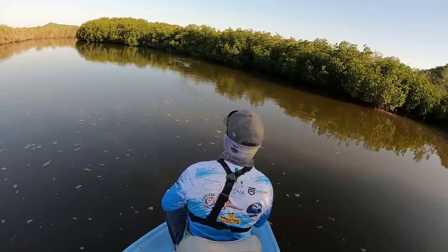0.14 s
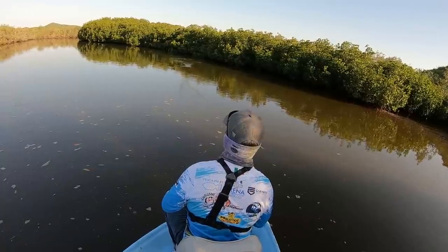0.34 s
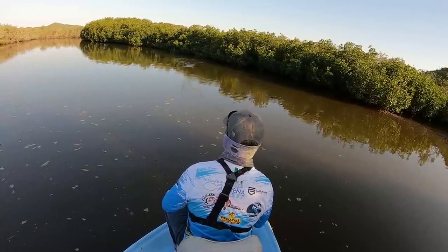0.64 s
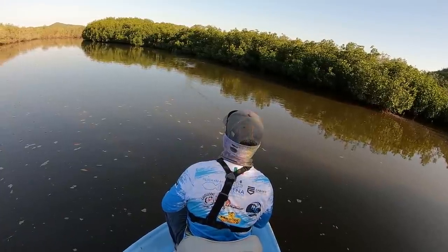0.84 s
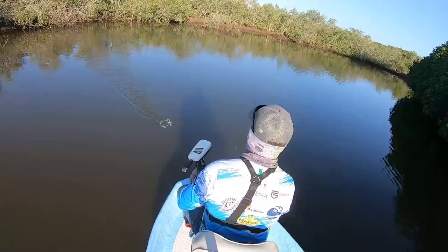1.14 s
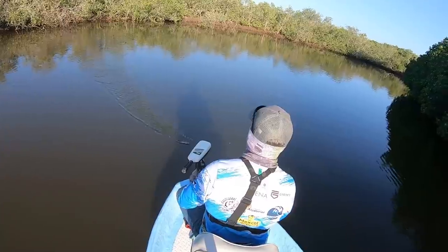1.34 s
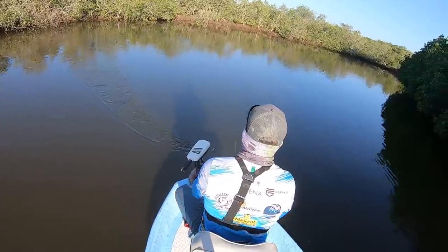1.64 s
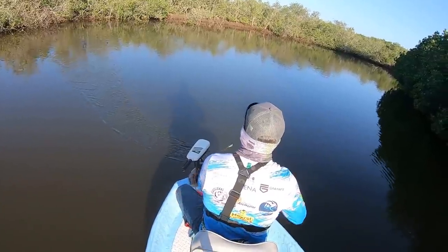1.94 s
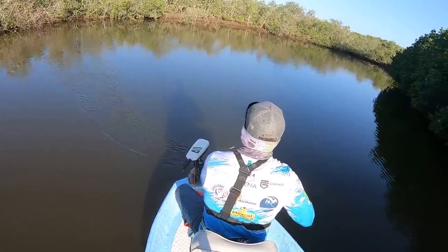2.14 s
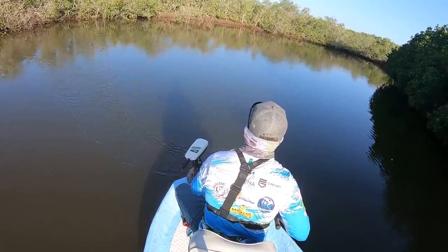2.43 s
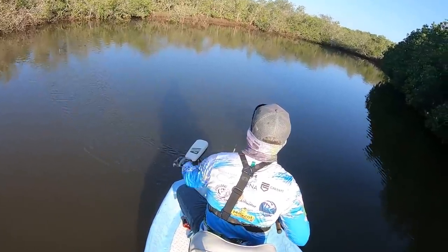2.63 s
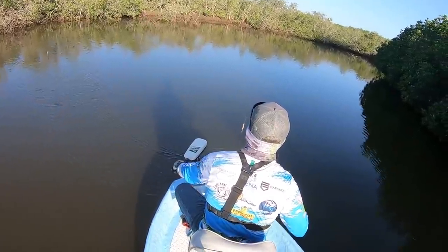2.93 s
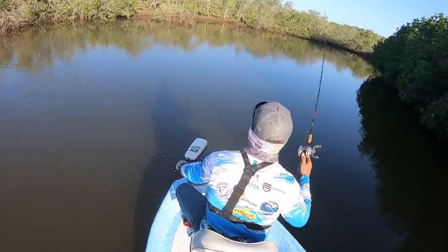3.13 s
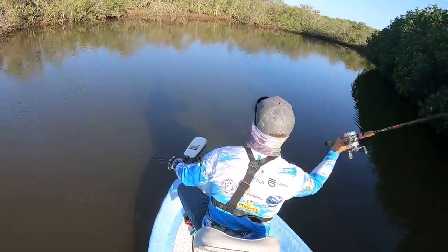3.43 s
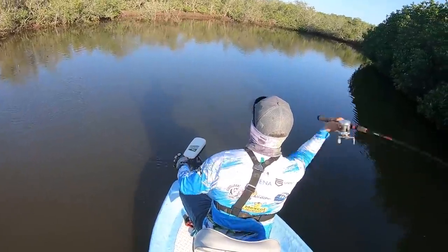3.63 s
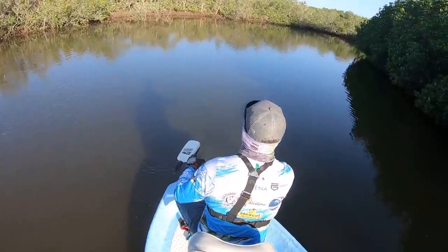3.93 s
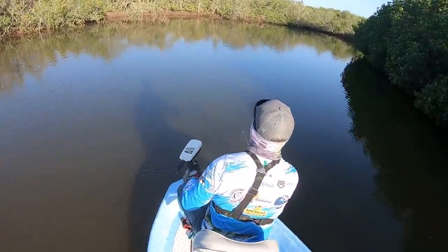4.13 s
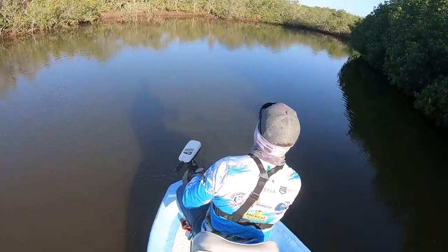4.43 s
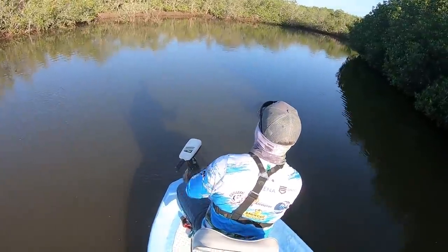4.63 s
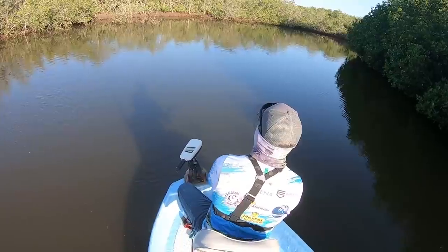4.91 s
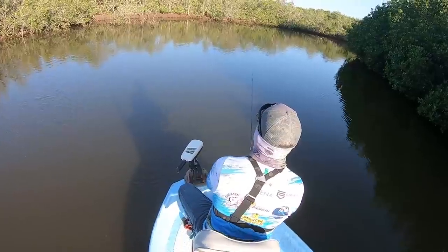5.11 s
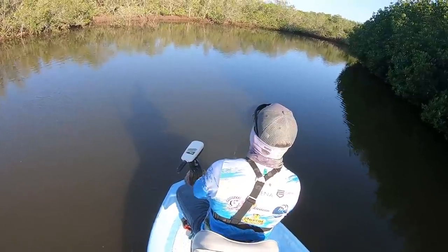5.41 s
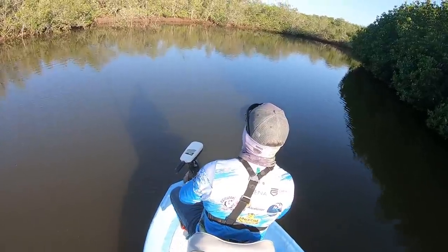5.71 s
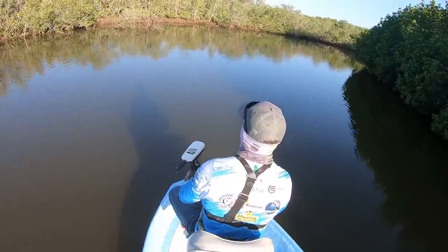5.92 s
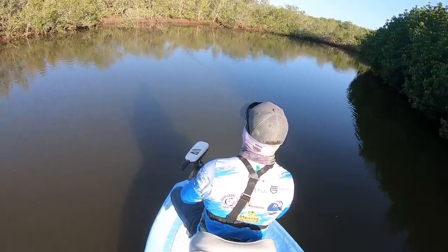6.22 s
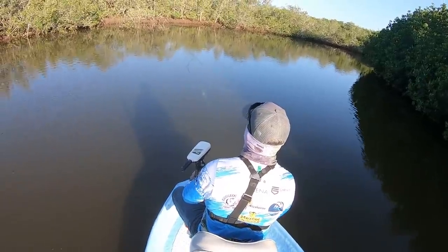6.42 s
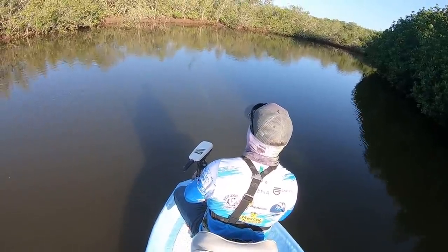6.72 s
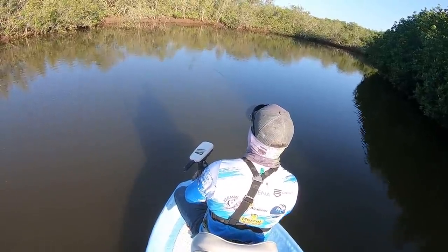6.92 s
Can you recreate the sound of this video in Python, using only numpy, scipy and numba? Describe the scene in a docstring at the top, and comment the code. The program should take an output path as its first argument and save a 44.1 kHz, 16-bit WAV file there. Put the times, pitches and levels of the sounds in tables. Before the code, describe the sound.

On a small boat in open still water, a low throbbing drone and pole thumps accompany faint winding. A lure skips out with fine spray and drips. The reel clicks open, the rod swishes back and whips forward with heavy knocks, and the spool whine slides down beneath hissing line. It stops, water laps, clicks follow and winding resumes. A camera microphone on a pole behind the angler picks up every bump, with no echo.

```python
"""Bow of a small boat on still open water: an angler casts, heard from a camera on a pole behind him.
The hull drones as a throbbing low resonance; winding, reel clicks and spray are shaped noise, rings and bubbles.
The rod swishes back and whips forward as noise swept through moving resonances, while the pole sways and knocks.
The spool whines down as wavering harmonics under hissing line, then reel clicks and winding return."""
import sys
import numpy as np
from scipy import signal
from scipy.fft import rfft, irfft, next_fast_len
from scipy.io import wavfile
from scipy.ndimage import uniform_filter1d
from numba import njit

SR = 44100
rng = np.random.default_rng(int(sys.argv[2]) if len(sys.argv) > 2 else 0)


def pcm_store(signal):
    """Save signal as 16-bit PCM."""
    levels = np.round(np.clip(np.atleast_2d(signal), -1, 1) * 32767)
    wavfile.write(sys.argv[1], SR, levels.astype(np.int16).T)


N = 311263
TIME = np.arange(N) / SR  # s
AGE = TIME[:SR // 2]  # s since a short sound was struck

# All levels in dB are relative settings. A tone is a spectrum; each row: frequency in Hz, level in dB.
# Rod tip whipping forward. Each row: time in s, eddy pitch in Hz, level in dB.
TIP = [(3.78, 2280, -65), (3.81, 2620, -49), (3.85, 3700, -55), (3.888, 5000, -45.5), (3.902, 6500, -21.5),
       (3.913, 7800, -25), (3.93, 8550, -41), (3.96, 7000, -89)]
# Thick part of the rod. Each row: time in s, eddy pitch in Hz, level in dB.
SHAFT = [(3.8, 560, -79), (3.84, 710, -49), (3.86, 810, -30), (3.885, 980, -26), (3.91, 1240, -28.5),
         (3.94, 1400, -37.5), (3.97, 1000, -84)]
# Rush of air around the whole rod. Each row: time in s, level in dB.
WHIP = [(3.805, -68), (3.83, -43.5), (3.86, -45), (3.885, -53), (3.91, -33.5), (3.95, -44)]
# Tone of that rush. Each row: frequency in Hz, level in dB.
WHIP_TONE = [(1200, -11.5), (3000, 6), (6000, -3), (9000, -16), (14000, -42)]
# The back swing: when the tip is fastest, time until half that speed, eddy pitch then, and loudest moment.
BACK_FASTEST_S, BACK_HALF_S, BACK_HZ = 3.49, .255, 5000
BACK_LOUDEST_S, BACK_DB, BACK_RISE_S, BACK_FALL_S = 3.588, -50.5, 0.42, 0.28  # rise and fall span 20 dB

# Speed of the spool. Each row: time in s, mean whine pitch in Hz.
SPOOL_HZ = [(3.94, 1009), (3.99, 1048), (4.09, 987), (4.2, 860), (4.38, 656), (4.5, 568.7), (4.7, 464),
            (4.9, 376), (5.06, 303.3)]
# What the reel's body radiates. Each row: frequency in Hz, level in dB.
REEL_BODY = [(350, -30), (600, -19), (760, -6), (1000, -6), (1250, -10), (1500, -7), (1850, 2), (2050, 3),
             (2300, -2), (2570, 7), (2750, 0), (2900, -2), (3200, 0), (3750, 2.5), (4100, -6), (4600, -12),
             (6000, -21), (8000, -40)]
# Bearing rattle between the harmonics. Each row: multiple of the spool's pitch, level in dB.
BEARINGS = [(1.3, -10), (2.2, -13), (2.75, -9), (3.35, -5), (4.2, -6), (4.85, -4.5), (5.55, -3),
            (6.5, -4.5), (7.4, -5), (8.4, -5.5)]
# The spool runs up until SPIN_UP_S; its level is WHINE_DB when slow, plus WHINE_SPEED_DB at full speed.
SPIN_UP_S, SPIN_RISE_S, WHINE_DB, WHINE_SPEED_DB = 3.97, 0.066, -56.5, 16
ROUGH_PER_ORDER, ROUGH_SLOW, BEARING_ROUGH = .095, .5, .85  # shudder, as a share of the tone
SPOOL_WOBBLE, SLOW_WOBBLE = .003, .005  # share of the pitch; the second is added as the spool slows

# Line in the guides. Each row: frequency in Hz, level in dB.
HISS_TONE = [(260, -54), (450, -9.5), (559, -18.5), (658, -11), (749, -32), (808, -11.5), (872, -6),
             (1270, -6), (1400, -4.5), (1900, -5.5), (2660, 4), (3970, 1), (6000, -19.5), (7800, -73.5),
             (13200, -120)]
# Bright rush above the hiss. Each row: frequency in Hz, level in dB.
RUSH_TONE = [(2820, -15), (4800, -2), (6400, 2), (8670, -7.5), (10100, -6), (11100, -15), (14000, -22.5),
             (15000, -52.5)]
# Swell as the line runs out. Each row: time in s, level in dB.
PAYOUT = [(3.92, -0.5), (4.03, 1.5), (4.13, -4.5), (4.25, -3), (4.4, -2), (4.6, 0.5), (4.92, 0),
          (5.04, 1.5)]
# The line leaves in a surge that settles to a steady run, until the thumb stops the spool.
RELEASE_S, RELEASE_RISE_S, SURGE_S, STOP_S, STOP_T60_S = 3.89, 0.022, 0.21, 4.995, 0.44
HISS_DB, HISS_SURGE_DB = -44.5, 11.5  # steady level, and how much the surge adds
RUSH_DB, RUSH_SURGE_DB, RUSH_SAG_DB_PER_S = -53.5, 15, 6.5  # the rush also fades as the lure slows

# Thumb bar going down and latching. Each row: time in s, level in dB.
PRESSES = [(2.5324, -37), (2.5377, -23.5)]
# Modes of the thumb bar. Each row: frequency in Hz, level in dB, t60 in s.
THUMB_BAR = [(2600, -20, .028), (3120, -9.5, 0.03), (3530, -4.5, 0.018), (3840, -14, 0.016),
             (4550, -19, .03), (5200, -14, 0.036), (5640, -16, 0.033), (7650, -13, 0.011)]
# Clicks of reel and tackle, and a sharp tick at 1.177 s. Each row: time in s, level in dB, body relative level
# in dB, click t60 in s.
CLICKS = [(.842, -39.5, -2.5, 0.065), (1.177, -39, 7, 0.0082), (1.938, -53, 20, 0.047),
          (2.716, -49, -18.5, 0.025), (2.834, -52, -19, 0.035), (3.142, -32, 2.5, 0.037),
          (3.322, -52, 12, 0.059), (3.3361, -31.5, 5.5, 0.04), (3.4066, -31, 3.5, 0.064),
          (4.315, -32, 22.5, 0.028), (5.031, -31, -12, 0.067), (5.565, -35, 5, 0.021),
          (5.569, -35, -0.5, 0.071), (5.5981, -29, -1, 0.029), (5.871, -49.5, -4, 0.086),
          (6.566, -49.5, -16, 0.04)]
# Modes of the reel's frame. Each row: frequency in Hz, level in dB, t60 in s.
REEL = [(1410, -21, 0.05), (2520, -18.5, 0.056), (3080, 2.5, 0.032), (3500, -1.5, 0.043), (3920, -3, 0.019),
        (5500, -7.5, 0.036)]
# Bright tick of a click. Each row: frequency in Hz, level in dB.
CLICK_TONE = [(1060, -53.5), (1800, -5.5), (3790, 7), (4820, -11), (5500, -5), (9370, -21), (14100, -44.5),
              (15000, -40.5)]
# Duller body of a click. Each row: frequency in Hz, level in dB.
CLICK_BODY = [(250, 4), (450, -7), (600, -7.5), (800, -3), (1300, -5.5), (1900, -4), (2600, -12.5)]
# Rasps of line and thumb on the spool. Each row: peak time in s, level in dB, 20 dB rise in s, t60 in s.
RASPS = [(.47, -71, 0.29, .15), (.79, -61, 0.034, 0.15), (0.845, -69, .012, 0.31), (2.55, -56, .006, 0.3),
         (3.144, -49, 0.0087, 0.13), (5.598, -59, 0.019, 0.4), (6.087, -55, 0.017, 0.41),
         (6.571, -64, 0.027, 0.32)]
# Tone of the rasps. Each row: frequency in Hz, level in dB.
RASP_TONE = [(1500, -22), (3000, 8), (5000, 0.5), (7500, -5), (10000, -5.5), (14000, -28.5)]
# Clutch spring shivering after the press. Each row: frequency in Hz, level in dB.
SPRING_TONE = [(4000, -20), (5300, 1.5), (5650, -8), (6000, 0), (6600, -9), (7600, -8), (8600, -15),
               (12000, -26.5)]
SPRING_S, SPRING_DB, SPRING_T60_S = 2.558, -53, 0.33

# Pushes on the reel's handle. Each row: peak time in s, level in dB, s to rise or fall by 20 dB,
# line scrape relative level in dB.
PUSHES = [(.255, -58, .095, -7), (.435, -61.5, .05, -9), (.488, -56.5, .025, -9), (.568, -60, .03, -16),
          (.69, -63.5, .06, -11), (.748, -55, .032, -9), (.865, -59, .11, -8), (5.65, -53.5, .075, -15),
          (5.83, -56.5, .1, -26), (6.055, -57.5, .085, -26), (6.2, -60, .15, -10), (6.39, -68, .1, -26),
          (6.56, -59, .1, -20), (6.88, -65.5, .08, -24), (7.03, -60.5, .1, -24)]
# Whirr of the gears. Each row: frequency in Hz, level in dB.
GEAR_TONE = [(500, -21), (780, -1.5), (1020, -9.5), (1290, 3), (1500, -7), (2000, 0), (2650, -2.5),
             (3300, -1.5), (4250, -8.5), (5100, -29.5), (6200, -31.5), (7500, -26), (12000, -46.5)]
# Scrape of incoming line. Each row: frequency in Hz, level in dB.
SCRAPE_TONE = [(1500, 4.5), (2200, -0.5), (3200, 4.5), (5000, -5), (7000, -10), (9000, -28)]
WHIRR_S, WHIRR_DB = 3.8, -69  # faint steady whirr from here to the end, under the pushes
# Line snapping over roller and guides. Each row: time in s, level in dB, pitch in Hz, t60 in s.
TICKS = [(5.909, -52, 6200, .012), (6.086, -42, 8500, .03), (6.097, -44, 9000, .025),
         (6.1154, -48, 8000, .02), (6.1529, -34, 4050, .018), (6.1624, -45, 3180, .02)]

# Shifts of weight swaying the pole. Each row: peak time in s, level in dB, 20 dB rise in s, 20 dB fall in s.
SWAYS = [(.24, -25.5, 0.088, 0.067), (0.492, -19.5, 0.12, 0.16), (0.762, -17, 0.13, 0.17),
         (1.18, -25, 0.058, 0.24), (1.41, -19.5, 0.083, 0.15), (1.641, -23, 0.11, 0.54),
         (2.868, -37, 0.63, 1.5), (3.977, -11.5, 0.11, 0.16), (4.25, -41.5, 0.19, 3.3),
         (5.859, -32, 0.24, 0.21), (6.8, -44.5, 0.76, 0.17)]
# Tone of the sway. Each row: frequency in Hz, level in dB.
SWAY_TONE = [(20, -4.5), (30, 0.0), (45, -0.5), (60, -7.0), (120, -21.0), (250, -42.5)]
# Jolts through the pole. Each row: time in s, level in dB, pitch in Hz, t60 in s.
JOLTS = [(.488, -25.5, 212, 0.099), (0.749, -27, 216.3, 0.14), (1.385, -17, 37.5, 0.72),
         (2.864, -23.5, 110.6, 0.19), (2.869, -38, 265, 0.2), (3.41, -34, 216, 0.18),
         (3.43, -31.5, 303, 0.086), (3.94, -20.5, 206.5, 0.32), (3.974, -9, 42, 0.046),
         (4.012, -6, 74.5, 0.073), (4.014, -24.5, 292, 0.085), (4.082, -21.5, 219, 0.099),
         (4.322, -32, 224, 0.29)]
# Knocks in the pole's joint. Each row: time in s, level in dB, low ring relative level in dB,
# crack relative level in dB.
KNOCKS = [(0.2145, -51.5, -9.5, -15), (0.4394, -52, 1, -28), (0.4867, -46, 5.5, -3), (0.7487, -50.5, 5, -4),
          (1.3333, -21.5, -9.5, -13), (3.9312, -13, -7, -20.5), (3.9378, -27, -36.5, -28),
          (3.94, -23.5, 8.5, -34), (3.948, -17.5, -27, -16), (3.9544, -26, 0.5, -14),
          (4.0784, -17, -22, -48), (4.084, -15.5, -9.5, -13), (4.317, -27, -2, -17)]
# Modes of the joint. Each row: frequency in Hz, level in dB, t60 in s, phase between the microphone
# ports in radians.
JOINT = [(301, -16, 0.26, 1.43), (412, -14.5, 0.19, 2.4), (637, -3.5, 0.063, 2.3), (712, 0.5, 0.046, 2.3),
         (782, 0, 0.089, 3.5), (1103, -0.5, 0.056, 3.4), (1296, 4, 0.05, 2.24), (1310, -9, 0.028, 4.3),
         (1510, -34, 0.021, 1.1), (1940, -13.5, 0.016, .3), (2560, -29, 0.019, .3)]
# Crack of a knock. Each row: frequency in Hz, level in dB.
CRACK_TONE = [(200, 24.5), (1500, 7.0), (2800, 6.0), (6000, -28.0), (9000, -35.0)]
# Faint rubbing of the joint. Each row: peak time in s, level in dB, s to rise or fall by 20 dB.
CREAKS = [(.18, -71, .08), (.385, -68, .03), (.5, -63, .045), (.69, -63, .06), (.88, -70, .07),
          (1.41, -58, .07), (5.08, -61, .05), (5.16, -62, .02), (5.205, -63, .02), (5.52, -69, .07),
          (6.24, -66, .04)]
# Seat and grip bumping as the angler shifts. Each row: time in s, level in dB, pitch in Hz, t60 in s.
BUMPS = [(.44, -52, 885, 0.034), (.487, -51, 694, 0.035), (2.862, -48, 479, 0.18), (3.035, -42, 417, 0.053),
         (3.061, -43.5, 603, 0.084), (3.085, -49.5, 603, 0.19), (3.144, -39, 594, 0.086),
         (4.012, -33, 663, 0.04), (4.319, -43.5, 309.4, 0.24)]
# Rustle over the bumps. Each row: frequency in Hz, level in dB.
RUSTLE_TONE = [(300, 14.0), (700, 7.0), (1000, -14.0), (2000, -8.0), (3500, -35.5)]

# Lure skipping out and draining. Each row: time in s, level in dB, 20 dB attack in s, hold in s, t60 in s.
SPLASHES = [(1.178, -51, .001, 0.094, 1), (1.344, -51.5, 0.054, 0.032, 0.42),
            (1.57, -75, 0.019, 0.11, 0.93), (1.949, -63.5, 0.0018, 0.0091, 0.62)]
# Tone of the spray. Each row: frequency in Hz, level in dB.
SPRAY_TONE = [(290, -7), (500, 0), (684, 1.5), (755, -15), (1300, 2), (1580, -6.5), (2920, 0), (4350, -5),
              (9790, -20), (13800, -47), (15000, -57)]
# Largest drops. Each row: time in s, level in dB, starting bubble pitch in Hz, t60 in s.
DROPS = [(1.455, -46.5, 2820, 0.081), (1.497, -52, 880, 0.095), (1.576, -50, 2500, 0.013),
         (1.583, -50, 1550, 0.068), (1.5927, -50, 2250, .015), (1.6, -47, 1330, 0.074),
         (1.634, -54, 3690, 0.012), (1.673, -53, 3900, 0.013), (1.678, -53, 3050, 0.025),
         (1.7075, -52, 2390, 0.013), (1.712, -50, 4130, 0.011), (1.725, -55, 2270, 0.02),
         (1.767, -52, 4900, 0.011), (1.7725, -50, 3500, 0.012), (1.887, -48, 2800, 0.007),
         (5.337, -41.5, 2460, 0.023), (5.351, -40.5, 1940, 0.028), (5.413, -42, 2100, 0.016),
         (5.466, -47, 1740, 0.015), (5.502, -47, 1390, 0.018)]
# Wash under the lapping bubbles. Each row: frequency in Hz, level in dB.
SLOSH_TONE = [(600, 3), (1000, -6.5), (1600, -2), (2100, -1), (2800, -5), (4200, -14.5), (6000, -36)]
SLOSH_DB = -59
DRIP_S, DRIP_LENGTH_S, DRIP_DB = 1.49, 0.34, -63  # small drops run off the lifted lure
LAP_S, LAP_DB, LAP_WIDTH_S = 5.4, -59.5, 0.31  # water laps as the boat rocks after the cast

# Boat's low drone. Each row: time in s, level in dB.
DRONE = [(0, -23.5), (1.1, -30.5), (1.9, -37.5), (2.9, -30.5), (4.9, -37), (5.2, -28), (7.0, -28.5)]
# Hull rumble above the drone. Each row: time in s, level in dB.
RUMBLE = [(0, -58.5), (1.1, -50.5), (1.4, -52), (2.9, -44), (3.9, -47.5), (4.3, -43.5), (6.2, -40.5),
          (7.0, -47)]
# Tone of the hull. Each row: frequency in Hz, level in dB.
HULL_TONE = [(53, -35.5), (90, -5), (97, -2.5), (162, -4), (177, -12.5), (194, -13), (280, -26.5),
             (318, -25.5), (563, -48.5), (600, -41), (780, -66.5), (1320, -120)]
# Soft wash along the hull. Each row: time in s, level in dB.
WASH = [(1.15, -59), (1.22, -52), (3.2, -52), (3.5, -60), (3.8, -78.5)]
# Tone of the wash. Each row: frequency in Hz, level in dB.
WASH_TONE = [(120, -43.5), (200, -11), (232, 7.5), (264, -23), (298, -4.5), (377, -15), (441, -10.5),
             (630, -15.5), (838, -41), (1400, -29), (1820, -66), (3080, -120)]
DRONE_HZ, THROB_PER_S, THROB_DEPTH = 68.8, 21, 0.72  # mean pitch, random throb steps per s, depth

# Open air. Each row: frequency in Hz, level in dB.
AIR_TONE = [(180, -27), (300, -0.5), (486, -35), (715, -5), (1050, -12), (3870, -22.5), (5500, -30),
            (7700, -31), (11000, -50.5), (14000, -60.5)]
# Treble of the air. Each row: time in s, level in dB.
AIR_TREBLE = [(0, 3), (1.1, 3.5), (1.3, 0.5), (3.7, 8), (5.3, 2.5), (6.2, -1.5), (6.7, -6), (7.0, -6)]
# How unlike the two sides are. Each row: time in s, side share.
WIDTH = [(0, 1), (1.2, 0.9), (3.3, 0.94), (3.9, 1), (4.0, 0.69), (4.3, 0.11), (7, 0.6)]
# Stereo image at the camera's microphones. Each row: time in s, side level in dB.
IMAGE = [(4.35, -3), (4.5, 0.5), (4.65, -67), (7, -7.5)]
TOP_HZ = 15500


def amp(db):
    """Decibels to gain."""
    return 10 ** (np.asarray(db) / 20)


def unit(x):
    """Scale to rms 1."""
    return x / np.sqrt(np.mean(x ** 2))


def curve(rows, axis=1):
    """One column of a table, joined by straight lines in time."""
    rows = np.array(rows)
    return np.interp(TIME, rows[:, 0], rows[:, axis])


def swell(rows, axis=1):
    """Gain from a dB column, fading out beyond its ends."""
    outside = np.maximum(rows[0][0] - TIME, 0) + np.maximum(TIME - rows[-1][0], 0)
    return amp(curve(rows, axis=axis)) * np.exp(-outside / .012)


def hump(s, rise_s, fall_s):
    """Gain that peaks at time s, and is 20 dB lower rise_s before and fall_s after."""
    return amp(-20 * np.maximum((s - TIME) / rise_s, (TIME - s) / fall_s))


def stroke(s, width_s):
    """A rounded push that peaks at time s and is 20 dB lower width_s either side."""
    return amp(-20 * ((TIME - s) / width_s) ** 2)


def held(start_s, end_s, rise_s, t60):
    """Gain that rises 20 dB per rise_s to 1 at start_s, holds until end_s and dies away."""
    rise = amp(-20 * np.maximum(start_s - TIME, 0) / rise_s)
    return rise * np.exp(-np.log(1000) * np.maximum(TIME - end_s, 0) / t60)


def fade(t60):
    """Exponential decay of a struck thing."""
    return np.exp(-np.log(1000) * AGE / max(t60, .002))


def walk(rate):
    """Smoothed random steps, rate per second, with rms 1."""
    k = max(int(SR / rate), 1)
    steps = rng.standard_normal(N)[np.arange(N) // k]
    return unit(uniform_filter1d(steps, k))


def noise(grain_db=0, spread=1):
    """Stereo noise; uneven grain sizes make it crackle."""
    mid, side, size = rng.standard_normal((3, N))
    share = spread * curve(WIDTH)
    stereo = (mid + share * np.array([side, -side])) / np.hypot(1, share)
    return unit(stereo * amp(grain_db * size))


def colour(x, points):
    """Filter by a (Hz, dB) spectrum that falls steeply past its ends; rms 1."""
    hz, db = np.transpose(points)
    size = next_fast_len(N)
    octave = np.log2(np.maximum(np.fft.rfftfreq(size, 1 / SR), 1))
    past = octave - np.clip(octave, np.log2(hz[0]), np.log2(hz[-1]))
    gain = amp(np.interp(octave, np.log2(hz), db) - 31 * abs(past))
    return unit(irfft(rfft(x, size) * gain, size)[..., :N])


@njit
def svf(x, hz, width):
    """State-variable band-pass with a moving centre."""
    y, band, low = np.empty(len(x)), 0., 0.
    for i in range(len(x)):
        g, k = np.tan(np.pi * hz[i] / SR), width[i] / hz[i]
        v = (band + g * (x[i] - low)) / (1 + g * (g + k))
        band, low, y[i] = 2 * v - band, low + 2 * g * v, k * v
    return y


def resonate(x, hz, width):
    """A steep resonance on both channels, its power evened out as the width changes."""
    hz, width = hz * np.ones(N), width * np.ones(N)
    ringing = np.array([svf(svf(c, hz, width), hz, width) for c in x])
    return unit(ringing / np.sqrt(width))


def pan(db):
    """Channel gains for a left minus right level."""
    return amp([[db / 2], [-db / 2]])


def add(out, s, sound):
    """Mix a short sound in at time s."""
    i = max(int(s * SR), 0)
    out[:, i:i + sound.shape[-1]] += sound[..., :N - i]


def burst(source, s, t60):
    """A dying stretch of a noise."""
    return source.take(int(s * SR) + np.arange(len(AGE)), axis=1, mode="wrap") * fade(t60)


def eddies(hz, spread):
    """The whistle of the rod's tip, over a broader swish from the section below it."""
    return resonate(noise(), hz, spread * hz) + amp(-4.5) * resonate(noise(), 0.59 * hz, 0.36 * hz)


def rod():
    """Air sheds eddies off the rod, higher where it is thinner and faster: a slow swing back, a whip forward."""
    back_speed = 1 / (1 + ((TIME - BACK_FASTEST_S) / BACK_HALF_S) ** 2)
    back = eddies(BACK_HZ * np.maximum(back_speed, .2), spread=0.23)
    back = back * amp(BACK_DB) * hump(BACK_LOUDEST_S, BACK_RISE_S, BACK_FALL_S)
    forward = eddies(curve(TIP), spread=0.075) * swell(TIP, axis=2)
    forward = forward + colour(noise(), WHIP_TONE) * swell(WHIP)
    shaft_hz = curve(SHAFT)
    whistle = resonate(noise(), shaft_hz, .22 * shaft_hz)
    shaft = whistle + amp(-3.5) * resonate(noise(), 0.47 * shaft_hz, 1.1 * shaft_hz)
    shaft = shaft * swell(SHAFT, axis=2)
    # the tip swings out on the right and comes forward overhead
    return (back * pan(-6) + forward * pan(-1.7) + shaft) / 2


def partial(phase, rough):
    """A tone of rms near 1 that shudders in level and phase."""
    shudder = rough * (walk(260) + 1j * walk(260)) / np.sqrt(2)
    return np.sqrt(2 / (1 + rough ** 2)) * np.imag((1 + shudder) * np.exp(1j * phase))


def whine(count=9):
    """Spool harmonics and bearing rattle sweep down through the reel's resonances and blur into a whirr."""
    hz = curve(SPOOL_HZ)
    speed = (hz - hz.min()) / np.ptp(hz)
    slow = (1 - speed) ** 2
    # loose coils tug at the spool more as it slows
    wobble = (SPOOL_WOBBLE + SLOW_WOBBLE * slow) * walk(170)
    phase = 2 * np.pi * np.cumsum(hz * (1 + wobble)) / SR
    body_hz, body_db = np.transpose(REEL_BODY)
    out = 0
    for k in range(1, count + 1):
        # the even harmonics lead at full speed; uneven drag roughens the upper ones most
        db = np.interp(k * hz, body_hz, body_db) - 7 * speed ** 2 * (k % 2)
        db = db - (4 * speed ** 2 - 1.5) * (k > 3) - 1.5 * (k > 5) - .5 + 1.5 * walk(35)
        rough = ROUGH_PER_ORDER * k * (1 + ROUGH_SLOW * slow * (k > 3))
        out = out + amp(db) * partial(k * phase, rough)
    for k, bearing_db in BEARINGS:
        db = bearing_db + np.interp(k * hz, body_hz, body_db) + 2 * (speed - 1) + 3 * walk(25)
        out = out + amp(db) * partial(k * phase, BEARING_ROUGH)
    level = amp(WHINE_DB + WHINE_SPEED_DB * speed ** 2.9)
    return out * level * held(SPIN_UP_S, STOP_S, SPIN_RISE_S, 0.095)


def line():
    """Line flutters off the spool and hisses through the guides, hardest and brightest just after release."""
    flight_s = np.maximum(TIME - RELEASE_S, 0)
    surge = np.exp(-flight_s / SURGE_S)
    hiss = colour(noise(4.1), HISS_TONE) * amp(HISS_DB + HISS_SURGE_DB * surge)
    rush_db = RUSH_DB + RUSH_SURGE_DB * surge - RUSH_SAG_DB_PER_S * flight_s
    rush = colour(noise(3.1), RUSH_TONE) * amp(rush_db)
    # loose coils slap unevenly
    flutter_db = 1.8 * walk(220) + 1.1 * walk(45)
    running = held(RELEASE_S, STOP_S, RELEASE_RISE_S, STOP_T60_S)
    return (hiss + rush) * running * amp(curve(PAYOUT) + flutter_db)


def thumb_bar():
    """The clutch snaps open: a few bright modes over a thin tick."""
    out = np.zeros((2, N))
    tick = colour(noise(), CLICK_TONE)
    for s, db in PRESSES:
        ring = 0
        for hz, mode_db, t60 in THUMB_BAR:
            detuned_hz = hz * (1 + 0.0037 * rng.standard_normal())
            ring = ring + amp(mode_db) * fade(t60) * np.sin(2 * np.pi * detuned_hz * AGE)
        sound = ring + amp(-11) * burst(tick, s, 0.04)
        add(out, s, amp(db) * sound * (1 - fade(0.0059)) * pan(-2.2))
    return out


def tackle():
    """Clicks are a bright tick, a duller body and a frame ring; the spring shivers and the spool rasps."""
    out = np.zeros((2, N))
    tick, body = colour(noise(), CLICK_TONE), colour(noise(), CLICK_BODY)
    for s, db, body_db, t60 in CLICKS:
        ring = 0
        for hz, mode_db, mode_t60 in REEL:
            detuned_hz = hz * (1 + 0.0055 * rng.standard_normal())
            ring = ring + amp(mode_db) * fade(mode_t60) * np.sin(2 * np.pi * detuned_hz * AGE)
        # the ring is stronger where the body is weak
        sound = amp(-9.0) * burst(tick, s, t60) + amp(-22.0 - 0.55 * body_db) * ring
        sound = sound + amp(body_db - 11.0) * burst(body, s, 1.57 * t60)
        side = pan(-5 * np.interp(s, *np.transpose(WIDTH)))
        add(out, s, amp(db) * sound * (1 - fade(0.0031)) * side)
    spring = colour(noise(3), SPRING_TONE) * amp(SPRING_DB) * held(SPRING_S, SPRING_S, 0.016, SPRING_T60_S)
    rasp_level = sum(amp(db) * held(s, s, rise, t60) for s, db, rise, t60 in RASPS)
    return out + spring + colour(noise(1.7), RASP_TONE) * rasp_level


def winding():
    """Line scrapes and gears whirr and sing with each push of the handle, over a faint steady whirr."""
    effort = sum(amp(db) * stroke(s, width) for s, db, width, _ in PUSHES)
    effort = np.hypot(effort, amp(WHIRR_DB) * held(WHIRR_S, TIME[-1], 0.08, 1))
    rub = colour(noise(6), GEAR_TONE) * amp(2.6 * walk(60))
    gears = resonate(noise(4), 2600, 700) * amp(2 * walk(80))
    gears = gears * np.sqrt(effort / effort.max())
    scrape = colour(noise(8), SCRAPE_TONE) * amp(3 * walk(90))
    scrape = scrape * sum(amp(db + scrape_db) * stroke(s, width) for s, db, width, scrape_db in PUSHES)
    return (rub * amp(-5.5) + gears * amp(-2.5)) * effort + scrape


def ticks():
    """Taut line snaps over an edge: a tiny crack around one pitch."""
    out = np.zeros((2, N))
    for s, db, hz, t60 in TICKS:
        centre = hz * np.ones(len(AGE))
        width = .7 * centre
        snaps = rng.standard_normal((2, len(AGE))) * fade(t60)
        crack = np.array([svf(svf(c, centre, width), centre, width) for c in snaps])
        add(out, s, amp(db - 2) * crack / abs(crack).max())
    return out


def pole():
    """The camera pole sways and jolts as the angler moves, and its joint knocks."""
    sway = colour(rng.standard_normal(N), SWAY_TONE)
    sway = signal.hilbert(sway, next_fast_len(N))[:N]
    sway_level = sum(amp(db) * hump(s, rise, fall) for s, db, rise, fall in SWAYS)
    # the left port feels the sway weaker and a quarter cycle late
    out = np.array([sway.imag, sway.real]) * sway_level * pan(-9.5)
    for s, db, hz, t60 in JOLTS:
        thump = np.sin(2 * np.pi * hz * AGE + np.array([[-1.8], [0]]))
        add(out, s, amp(db) * pan(-7.0) * fade(t60) * (1 - fade(0.0036)) * thump)
    crack = colour(noise(spread=.4), CRACK_TONE)
    for s, db, low_db, crack_db in KNOCKS:
        ring = 0
        for hz, mode_db, t60, lag in JOINT:
            # shaken through the case, the two ports ring out of step
            detuned_hz = hz * (1 + 0.022 * rng.standard_normal())
            phase = 2 * np.pi * detuned_hz * AGE + np.array([[lag], [-lag]]) / 2
            ring = ring + amp(mode_db + 0.85 * low_db * (hz < 900)) * fade(t60) * np.sin(phase)
        snap = amp(crack_db) * burst(crack, s, 0.062) * (1 - fade(0.0017))
        add(out, s, amp(db + 7.0) * pan(-0.28) * (ring * (1 - fade(0.01)) + snap))
    return out


def creaks():
    """Slow rubbing in the pole's joint sounds two of its resonances."""
    ring = resonate(noise(2), 1290, 130) + amp(-5.5) * resonate(noise(3), 760, 160)
    return ring * sum(amp(db) * stroke(s, width) for s, db, width in CREAKS)


def bumps():
    """Soft contacts: a dull, damped resonance with a little rustle over it."""
    out = np.zeros((2, N))
    rustle = colour(noise(4.7), RUSTLE_TONE)
    for s, db, hz, t60 in BUMPS:
        thud = fade(t60) * np.sin(2 * np.pi * hz * AGE)
        contact = amp(4.0) * thud + amp(3.5) * burst(rustle, s, t60)
        add(out, s, amp(db) * contact * (1 - fade(0.014)))
    return out


def bubble(hz, t60):
    """A bubble rings and rises in pitch as it nears the surface."""
    return fade(t60) * (1 - fade(0.0038)) * np.sin(2 * np.pi * hz * (AGE + 8 * AGE ** 2))


def gurgle(level, start_s, length_s, low_hz, high_hz, cycles, count):
    """A swarm of small bubbles of uneven size, up to 10 dB over the level at their moment."""
    out = np.zeros((2, N))
    for when, pitch, size, side in rng.random((count, 4)):
        s = start_s + when * length_s
        hz = low_hz * (high_hz / low_hz) ** pitch
        gain = np.interp(s, TIME, level) * amp(10 * size)
        add(out, s, gain * pan(8 * side - 4) * bubble(hz, cycles / hz))
    return out


def water():
    """Fine spray and bubbles as the lure skips out, drips after it, and lapping at the hull."""
    splash = sum(amp(db) * held(s + attack, s + attack + hold, attack, t60)
                 for s, db, attack, hold, t60 in SPLASHES)
    out = colour(noise(7.4), SPRAY_TONE) * splash * amp(3.1 * walk(120))
    out = out + gurgle(splash * amp(-7.0), 1.1, 0.99, 1400, 6000, cycles=38, count=300)
    drip = amp(DRIP_DB) * np.ones(N)
    out = out + gurgle(drip, DRIP_S, DRIP_LENGTH_S, 1380, 5600, cycles=24, count=45)
    lap = hump(LAP_S, LAP_WIDTH_S, LAP_WIDTH_S)
    out = out + gurgle(amp(LAP_DB) * lap, 5.08, 0.33, 650, 2900, cycles=15, count=200)
    out = out + colour(noise(5.3), SLOSH_TONE) * amp(SLOSH_DB + 2.3 * walk(70)) * lap
    for s, db, hz, t60 in DROPS:
        add(out, s, amp(db) * bubble(hz, t60))
    return out


def boat():
    """A throbbing low resonance, rumble above it and water along the hull."""
    phase = 2 * np.pi * np.cumsum(DRONE_HZ + 3.4 * walk(16)) / SR
    side_phase = 0.75 * curve(WIDTH) * np.array([walk(4.5), walk(12)])
    drone = np.sqrt(2) * np.sin(phase + side_phase)
    # the throb dips deeply but never swells far
    throb = unit(np.tanh(1 + THROB_DEPTH * walk(THROB_PER_S)))
    drone = drone * throb + amp(-9.0) * resonate(noise(), 73.0, 42)
    drone = drone * amp(curve(DRONE) - 0.66)
    rumble = colour(noise(spread=0.27), HULL_TONE) + amp(-7.0) * resonate(noise(spread=0.27), 164.7, 8.4)
    wash = colour(noise(1.4, spread=0.82), WASH_TONE) + amp(-7.0) * resonate(noise(spread=0.58), 226.6, 26)
    return drone + rumble * amp(curve(RUMBLE)) + wash * swell(WASH)


def air():
    """Faint open air as shaped noise; its treble thins out towards the end."""
    hiss = colour(noise(), AIR_TONE)
    high_pass = signal.butter(2, 4500, "high", fs=SR, output="sos")
    treble = signal.sosfiltfilt(high_pass, hiss)
    return (hiss + treble * (amp(curve(AIR_TREBLE)) - 1)) * amp(-66.5 + 0.35 * walk(0.28))


def scene():
    """Everything on and around the boat; open water gives no echo."""
    cast = rod() + whine() + line()
    reel = thumb_bar() + tackle() + winding() + ticks()
    handling = pole() + creaks() + bumps()
    return cast + reel + handling + water() + boat() + air()


def record(dry):
    """The camera's two channels draw together to mono, then slowly part; the top is cut and the end fades."""
    mid = (dry[0] + dry[1]) / 2
    side = (dry[0] - dry[1]) / 2 * amp(curve(IMAGE))
    ending = np.minimum((TIME[-1] - TIME) / .008, 1)
    top_cut = signal.ellip(8, .2, 70, TOP_HZ, fs=SR, output="sos")
    return ending * signal.sosfilt(top_cut, [mid + side, mid - side])


dry = scene()
out = record(dry)
pcm_store(out)
```